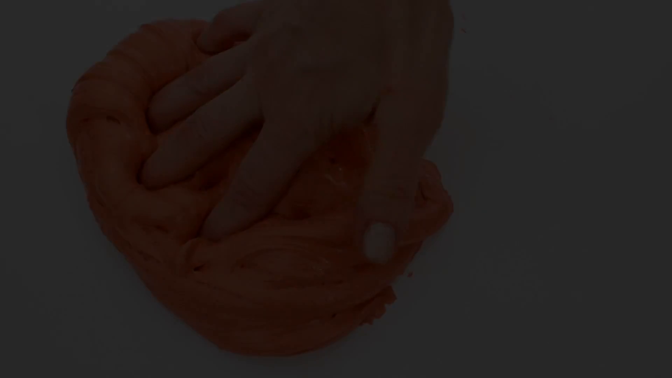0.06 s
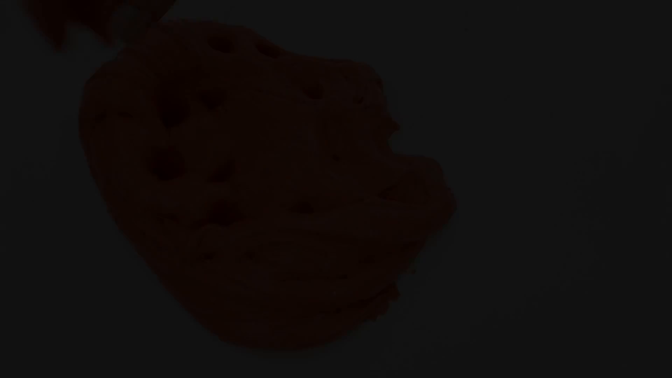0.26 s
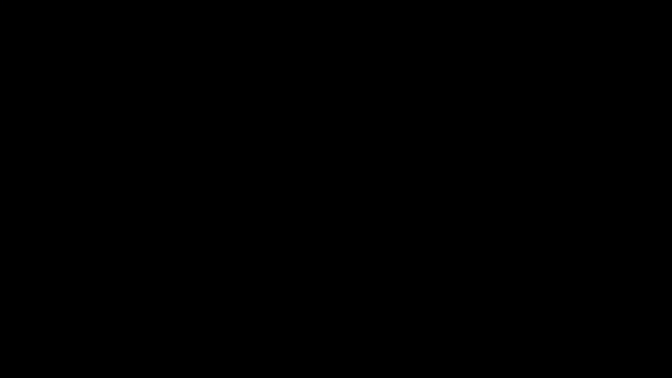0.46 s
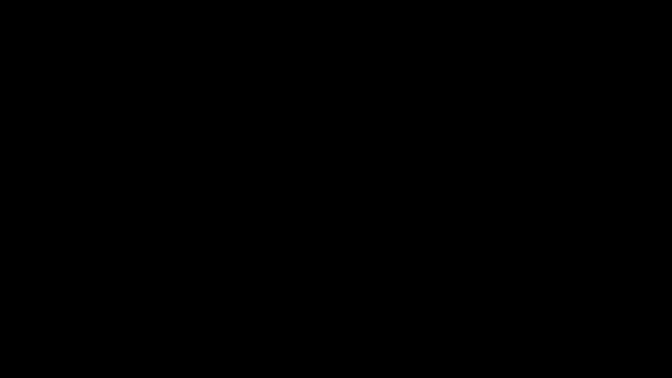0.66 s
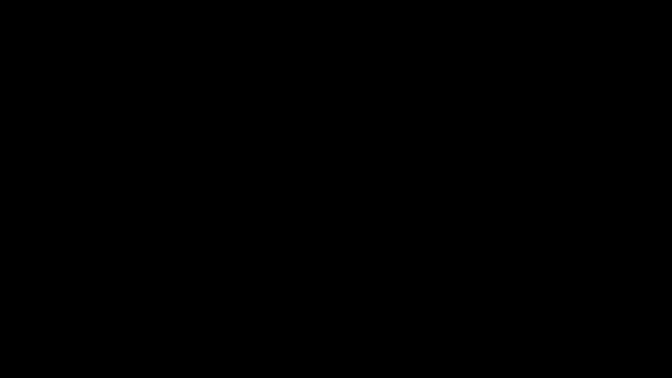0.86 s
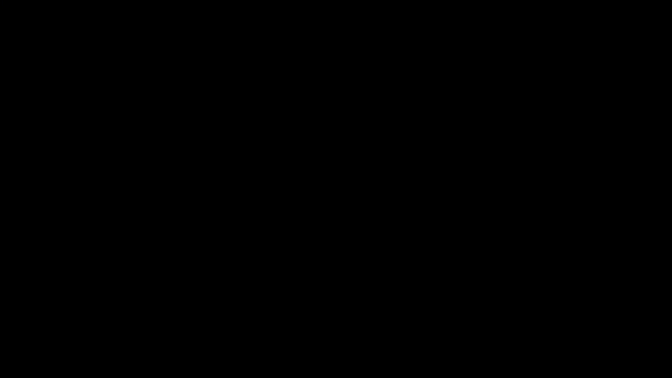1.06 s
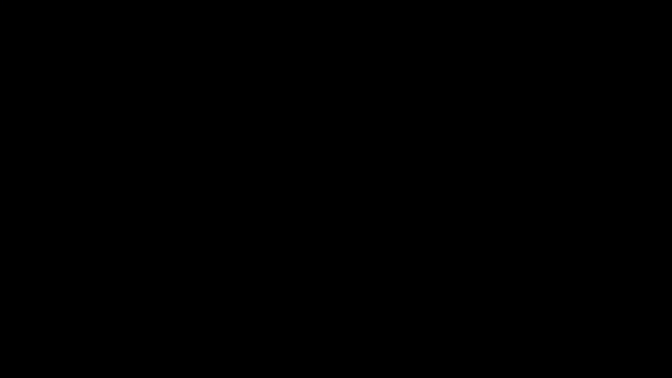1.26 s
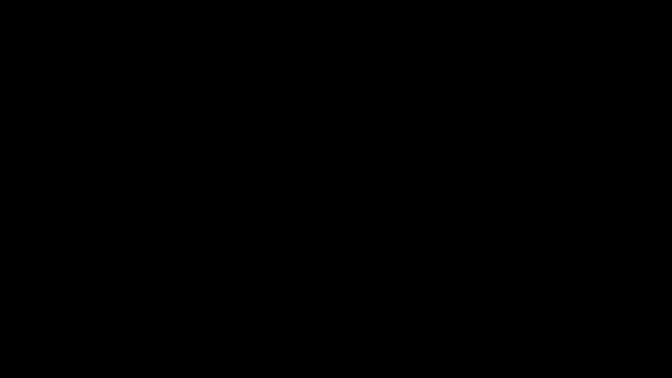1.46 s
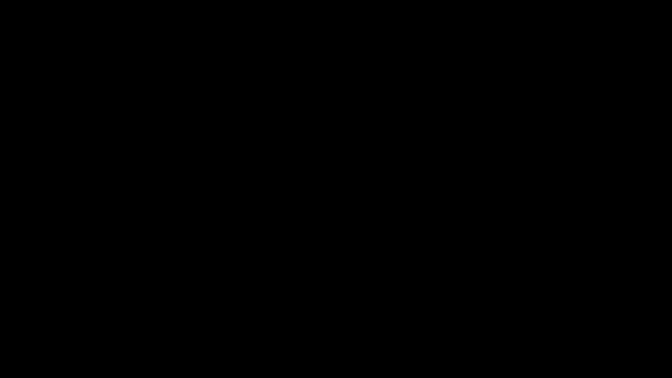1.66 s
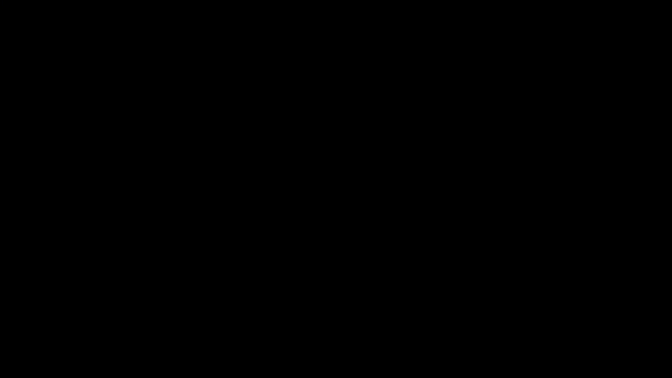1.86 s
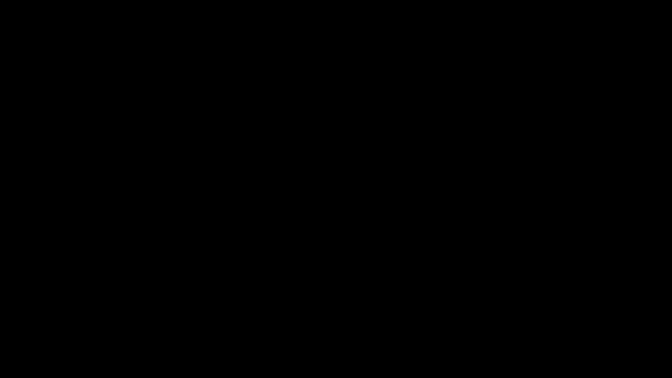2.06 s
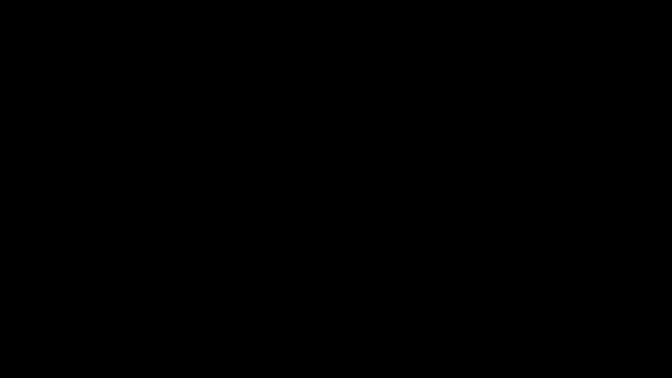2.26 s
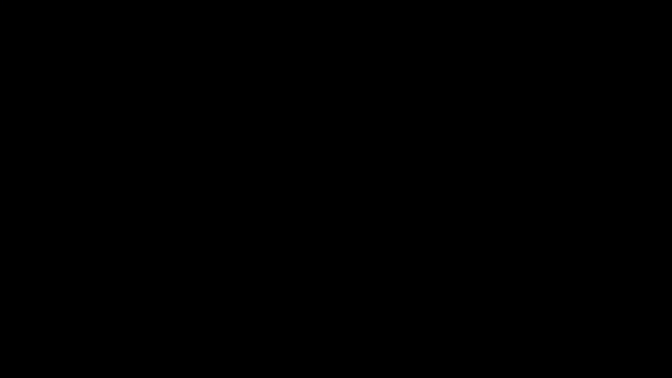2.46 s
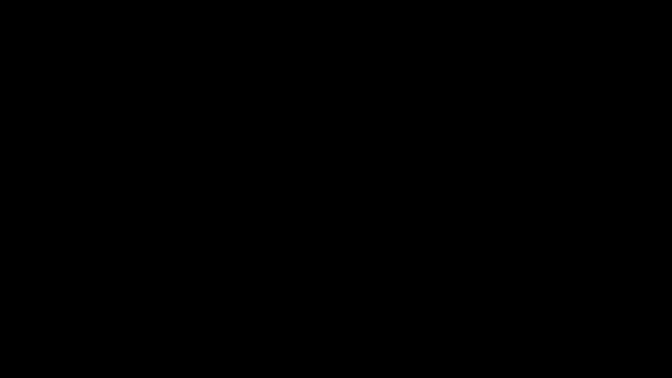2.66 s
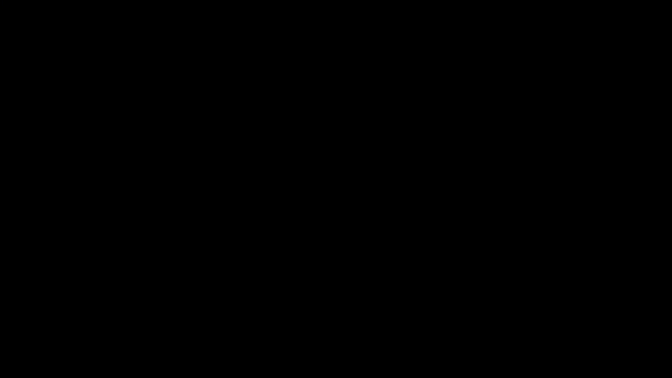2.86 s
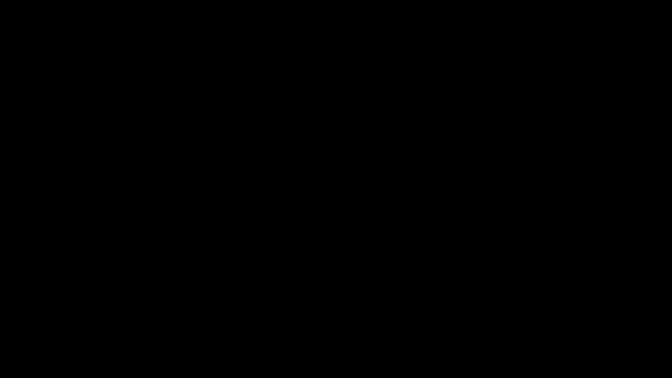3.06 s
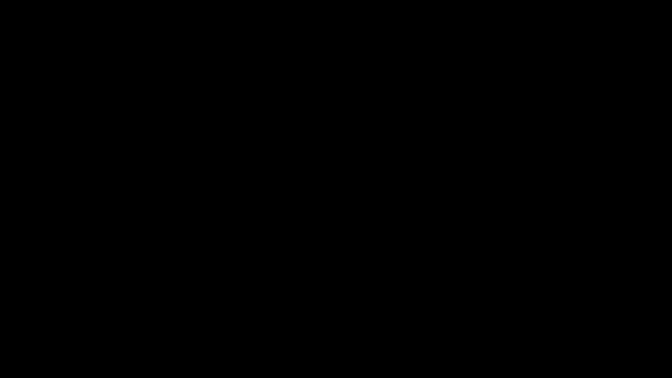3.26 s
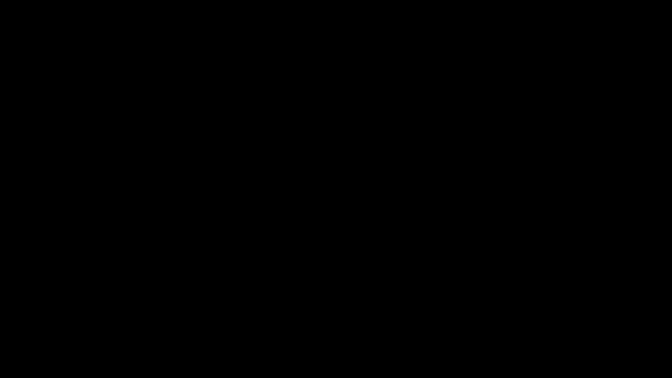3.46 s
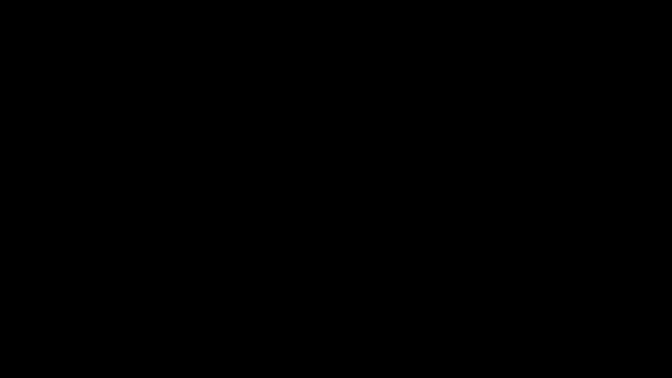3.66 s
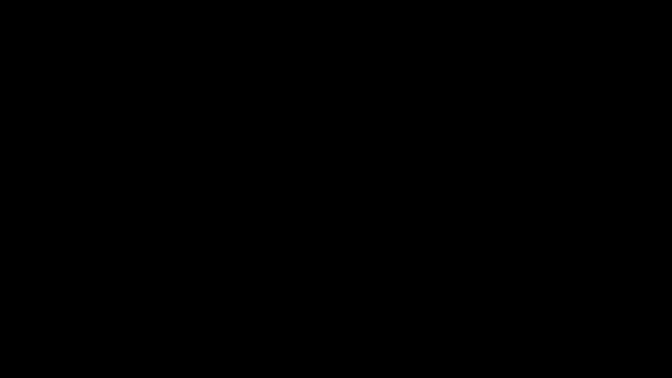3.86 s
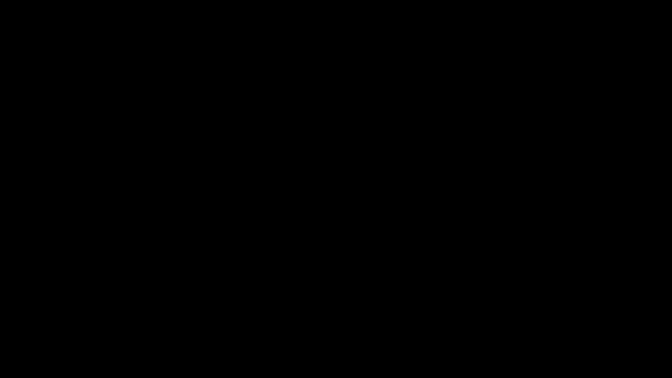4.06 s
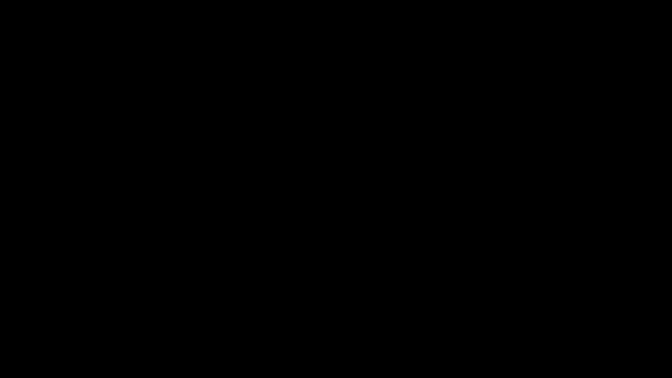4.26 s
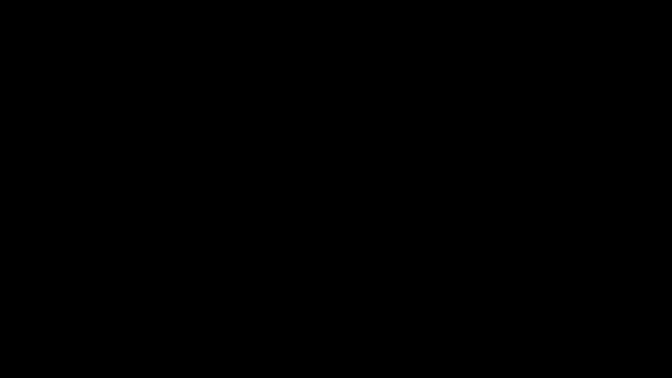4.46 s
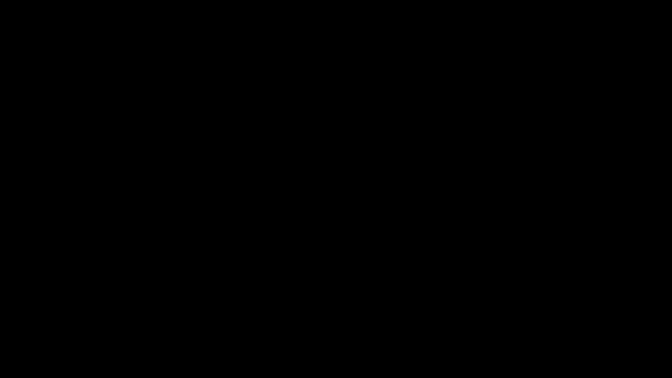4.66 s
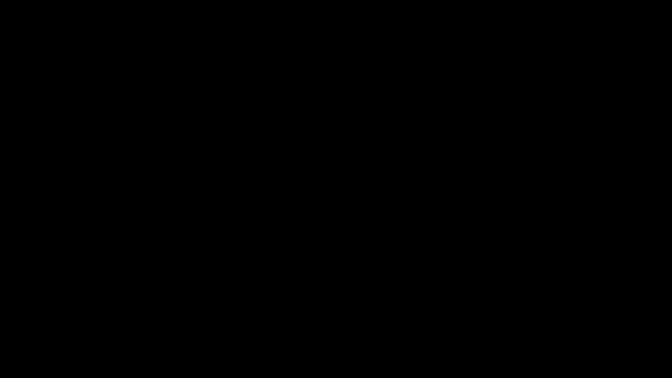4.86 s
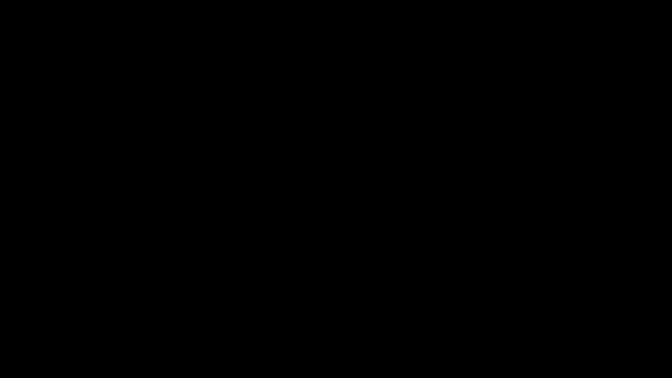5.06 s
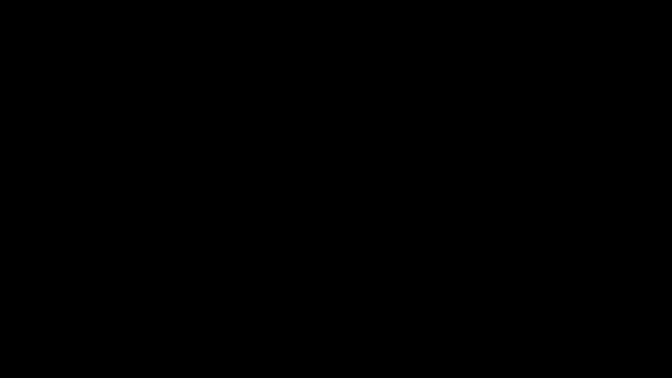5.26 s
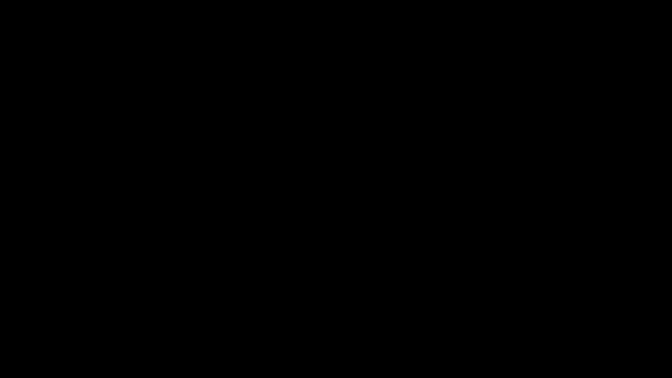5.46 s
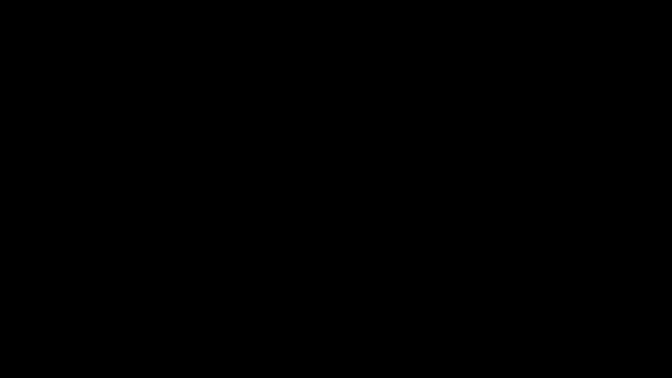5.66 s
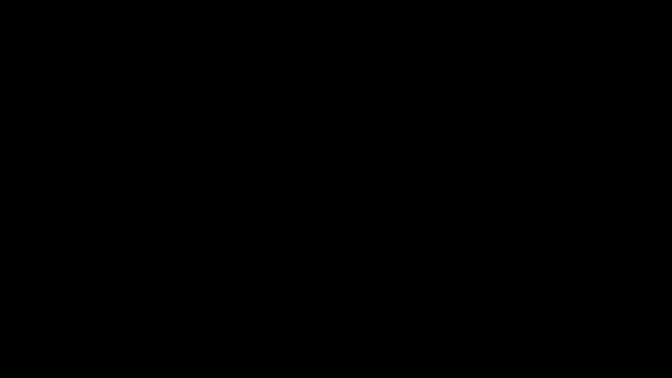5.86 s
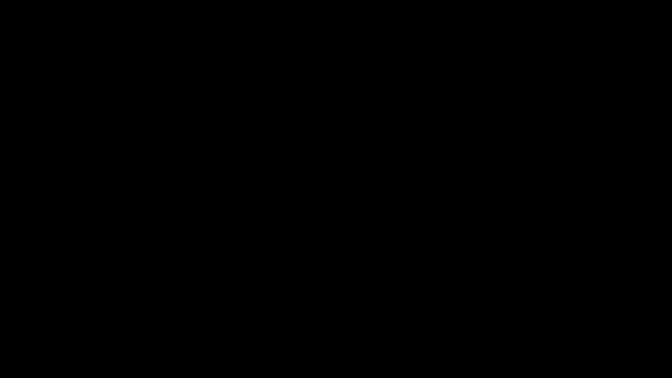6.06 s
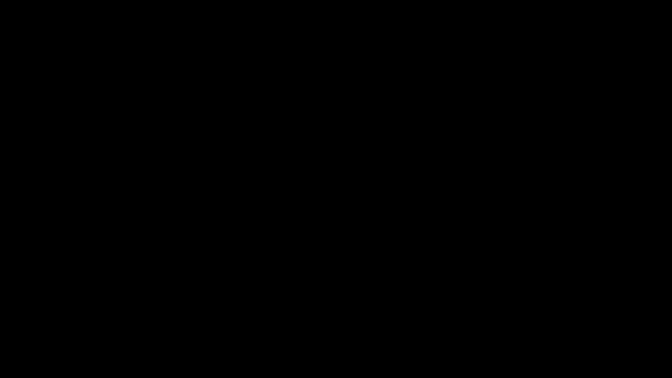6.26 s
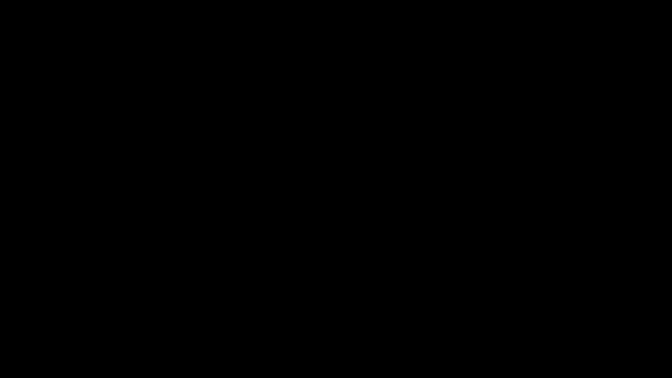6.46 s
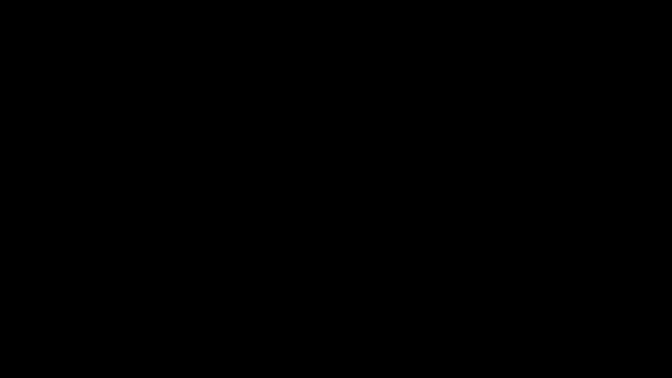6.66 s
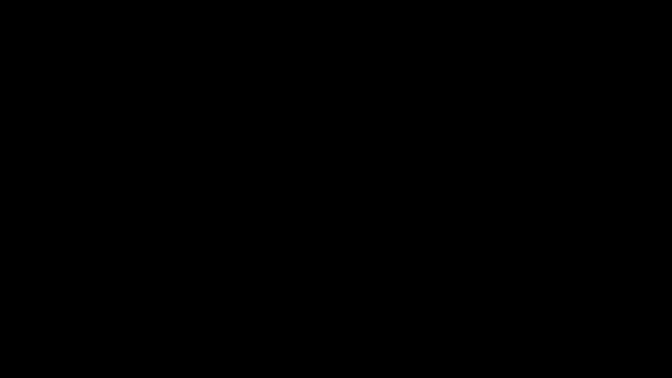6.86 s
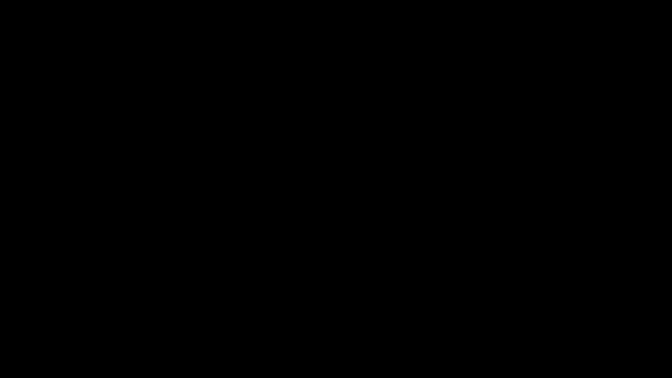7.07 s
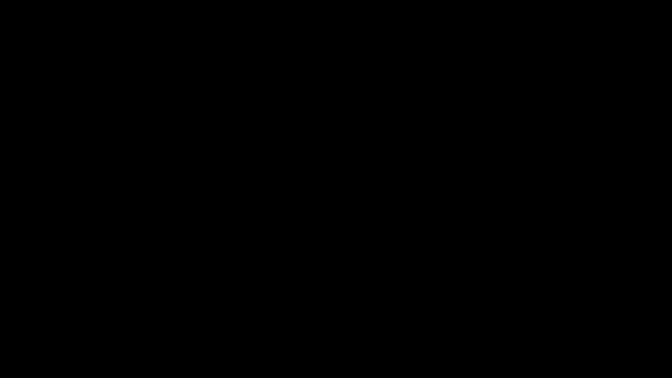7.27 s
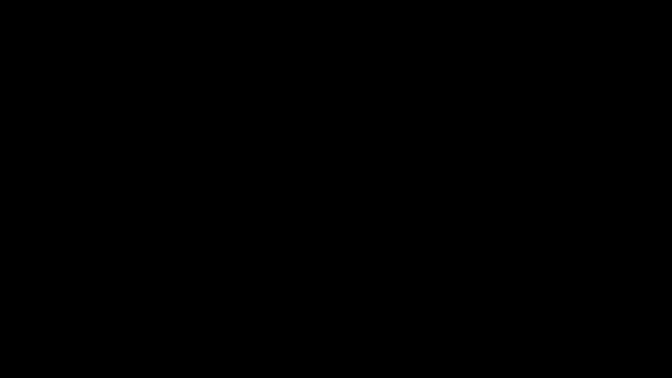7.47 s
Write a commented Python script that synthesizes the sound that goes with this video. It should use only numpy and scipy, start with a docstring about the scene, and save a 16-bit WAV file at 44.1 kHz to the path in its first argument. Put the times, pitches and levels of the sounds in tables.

```python
"""Thick slime is kneaded on a table in a small quiet room, between two spaced microphones.
From the start, trapped air pockets burst as clicks that ring in their cavities, sticky films tear in
a crackle of resonant grains, and thuds and booms ring the table's modes; the pops crowd up to 1.7 s.
Air first leaks from a gap at 1.9 s as gliding narrow-band noise, then at 3.8 and 5.6 s among sparser pops.
Under it all, noise-made hiss, a wavering sine hum and the settling slime slowly fade to the end."""
import sys
import numpy as np
from scipy import signal
from scipy.fft import rfft, irfft
from scipy.io import wavfile

SR = 44100
rng = np.random.default_rng(int(sys.argv[2]) if len(sys.argv) > 2 else 0)


def unload_audio(sound):
    """Save the sound as a 16-bit wav file, at the path given as the first command line argument."""
    columns = np.transpose(np.atleast_2d(sound))
    # keep every value between -1 and 1, then stretch to whole-number steps
    steps = np.round(np.clip(columns, -1, 1) * 32767)
    wavfile.write(sys.argv[1], SR, steps.astype(np.int16))


N = 331620

# Bursting air pockets, timed at the left microphone: start_s, left_peak_db, right_peak_db, pitch_hz
POPS = [(0.1614, -2.5, 6.5, 7600), (0.1812, -3.5, 1.5, 6350), (0.1925, -17.5, -11, 1570),
        (0.1963, -6, 4.5, 9250), (0.4014, -41, -38, 2090), (0.423, -46.5, -55, 2500),
        (0.4546, -41, -47, 2070), (0.505, -37, -37, 1900), (0.528, -42, -23, 13100),
        (0.5633, -16, -5, 15900), (0.6725, -14, -11, 9900), (0.694, -2.5, -0.5, 6400),
        (0.731, -17, -9.5, 10520), (0.7443, -7.5, -31, 7660), (0.758, -16, -10.5, 4400),
        (0.771, 0.5, 1.5, 6400), (0.8011, 3, 6, 11670), (0.8258, -37, -55, 8560), (0.8436, 5, 0.5, 12000),
        (0.852, -11, -10, 4230), (0.8655, -37, -12, 6450), (0.905, -16.5, -9.5, 7500),
        (1.3302, -32.5, -33, 2860), (1.3389, -34.5, -34, 1870), (1.4255, -44, -20.5, 13500),
        (1.4951, -12.5, -12.5, 3300), (1.508, -41, -22, 11000), (1.538, -32, -25, 10500),
        (1.557, -38, -19, 12940), (1.5643, -24.5, -23, 6850), (1.5882, -18, -15.5, 7100),
        (1.6068, -13, -9, 13500), (1.6167, 1.5, 8, 7000), (1.6276, 4.5, 7, 7030), (1.6553, 4, 2.5, 8120),
        (1.6685, -1, 3.5, 13130), (1.686, -16, 3.5, 12710), (1.692, -1, 1.5, 12400),
        (1.7095, -12.5, -5, 13800), (2.127, -30, -31, 1680), (2.1324, -22, -18.5, 5160),
        (2.2333, -37.5, -35.5, 7900), (2.3506, -35.5, -20.5, 5050), (2.389, -30, -41, 6900),
        (2.442, -3, -4, 13200), (2.446, 2, 1.5, 14800), (2.4814, -14, -37.5, 12900), (2.502, -9, -9, 11240),
        (2.5568, -59, -23.5, 12300), (2.636, -41.5, -21, 13000), (2.962, -53, -48.5, 5110),
        (3.134, -46.5, -42.5, 11000), (3.314, -23.5, -20.5, 2320), (3.3294, -11.5, -6, 7620),
        (3.629, -59.5, -41, 1940), (3.707, -22.5, -32, 12540), (3.7324, -31, -27.5, 4120),
        (3.769, -26, -33, 9200), (3.852, -40, -57.5, 11100), (3.882, -36.5, -35, 11500),
        (4.165, -74, -39.5, 11220), (4.229, -64, -33, 10170), (4.298, -46, -34, 3050),
        (4.4168, -60, -41.5, 10960), (4.595, -56, -36, 9850), (5.1325, -38, -37.5, 1597),
        (5.167, -43.5, -50, 2470), (5.218, -29.5, -24, 13000), (5.2945, -30.5, -31, 13400),
        (5.3883, -14, -21, 15000), (5.43, -28, -34, 8940), (5.488, -41.5, -29, 9550),
        (5.587, -36.5, -26, 14260), (5.745, -53, -47, 1796), (5.9727, -43.5, -35.5, 9850),
        (6.3556, -18, -13, 4670), (6.361, -29.5, -19.5, 7000), (6.7961, -50, -44, 10600),
        (6.8165, -51.5, -42, 11400), (6.9059, -41.5, -43, 10500), (7.0338, -51, -25.5, 12740),
        (7.066, -59, -48.5, 3010), (7.105, -57, -43.5, 7530), (7.2175, -56.5, -52.5, 13930),
        (7.311, -63, -51, 9400), (7.3434, -63.5, -38.5, 5740), (7.357, -60.5, -47, 10920)]
# Squeezes that tear the films, levels where the hold begins: hold_start_s, hold_s, crackle_db, squelch_db
SQUEEZES = [(0.122, 0.026, -54.5, -66), (0.18, 0.037, -39.5, -34.5), (0.41, 0.09, -67.5, -59.5),
            (0.563, 0.13, -56, -64), (0.689, 0.1, -44.5, -51), (0.763, 0.13, -40.5, -54),
            (0.958, .04, -54.5, -56.5), (1.012, 0.032, -54.5, -51.5), (1.029, 0.02, -51, -60.5),
            (1.078, 0.018, -47.5, -49.5), (1.34, 0.074, -65, -58), (1.463, 0.27, -56.5, -59.5),
            (1.618, 0.064, -33, -53), (1.837, .03, -54.5, -69), (1.863, 0.05, -46, -44),
            (2.138, 0.018, -58.5, -49), (2.225, 0.019, -61, -62.5), (2.444, 0.075, -43.5, -58.5),
            (2.632, 0.09, -51, -54), (2.73, 0.12, -60.5, -69), (3.334, 0.0043, -39, -42.5),
            (3.672, 0.2, -55.5, -60.5), (3.797, 0.028, -48.5, -60.5), (3.872, 0.033, -58.5, -66.5),
            (3.941, 0.0088, -57.5, -66), (4.004, 0.059, -65, -83), (4.091, 0.022, -68.5, -73),
            (4.178, 0.014, -70.5, -76), (4.294, 0.06, -66.5, -72), (4.825, 0.032, -63.5, -68),
            (4.87, 0.024, -50.5, -55), (5.126, 0.3, -66, -69.5), (5.393, .1, -52, -70),
            (5.597, 0.097, -60, -68), (5.651, 0.16, -60.5, -67), (6.356, 0.0082, -43.5, -55),
            (6.85, 0.14, -66, -75.5), (6.988, 0.11, -70, -72.5)]
# Relative spectrum of the tearing films: frequency_hz, density_db (per Hz)
CRACKLE_SPECTRUM = [(700, -21.5), (1500, -9.5), (3000, -13), (6000, -8), (9000, -4.5), (13000, -5.5),
                    (16500, -9)]
# Air escaping through a closing gap: start_s, length_s, first_pitch_hz, last_pitch_hz, level_db
LEAKS = [(1.948, 0.028, 6530, 6420, -49.5), (3.806, 0.176, 473.6, 514, -59.5),
         (5.602, .21, 430, 722, -62.5), (5.61, .09, 2500, 2120, -62)]
# Fingers and lumps knocking the table top: start_s, spectrum_centre_hz, level_db
THUDS = [(0.1608, 455, -17.5), (0.1815, 534, -13), (0.1926, 498, -18.5), (0.399, 295, -44),
         (0.4545, 250, -35.5), (0.5039, 332, -36), (0.6933, 563, -26.5), (0.772, 618, -28),
         (0.8486, 818, -24.5), (0.907, 650, -42.5), (0.955, 510, -35.5), (1.3343, 282, -30),
         (1.4965, 630, -30), (1.6193, 646, -31.5), (1.6563, 700, -40), (1.864, 557, -41.5),
         (2.1282, 317, -26), (2.1322, 316, -31), (2.636, 501.4, -42.5), (3.315, 550, -40.5),
         (3.3296, 583, -38.5), (3.628, 176.7, -38.5), (4.185, 495, -54.5), (4.299, 696, -55),
         (4.8897, 254.7, -34.5), (5.1297, 267, -39.5), (5.165, 279.6, -44.5), (6.3567, 396, -28)]
# The hand leaning on the table: start_s, spectrum_centre_hz, level_db
PUSHES = [(0.221, 56.5, -32), (1.038, 29.8, -45), (1.351, 62, -55.5), (1.903, 50.7, -44.5),
          (2.17, 51.1, -41.5), (2.67, 44.8, -51.5), (3.358, 39.7, -45.5), (3.659, 50.3, -45.5),
          (4.898, 41, -46.5), (5.16, 56.3, -54), (6.38, 46.14, -47)]
# Modes of the table top: frequency_hz, level_db, t60_s
TOP_MODES = [(116.74, -6.5, 0.23), (185, -3.5, 0.06), (229, -3.5, 0.07), (280, -10.5, 0.13),
             (401, -3.5, 0.039), (458.8, -7.5, 0.0057), (518, -4.5, 0.044), (736, 1.5, 0.02)]
# Modes of the table frame: frequency_hz, level_db, t60_s
FRAME_MODES = [(26, -3.5, 1), (46, -2, 0.16), (63, -2.5, 0.27)]
# Decay of the room's tail: frequency_hz, t60_s
ROOM_DECAY = [(200, 0.099), (1200, 0.24), (2800, 0.08), (7500, .19), (16000, .1)]
# Relative spectrum of the hiss: frequency_hz, density_db (per Hz)
HISS_SPECTRUM = [(20, -8), (33, -17), (48, -5.5), (75, -28.5), (130, -19), (260, -30.5), (600, -47.5),
                 (1300, -41), (2400, -42.5), (7000, -47), (16500, -48)]
# Hum, mean of both sides before its wavering and the fade: frequency_hz, level_db
HUM = [(97, -70)]
# Gain on hum, hiss and settling slime: time_s, gain_db
FADE = [(0, 6.5), (3, 4.5), (7.52, -5.5)]

# Squeezes: slopes in dB per second
RISE_DB_PER_S, SAG_DB_PER_S = 797, 60.5
CRACKLE_FALL_DB_PER_S, SQUELCH_FALL_DB_PER_S = 418, 399.5
REST_CRACKLE_DB, REST_SQUELCH_DB = -80, -80  # slime settling between squeezes, before the fade
GRAINS_PER_S = 2000  # mean rate of film snaps per stream, before clumping
# Right side over left, in dB, and its later arrival
SLIME_RIGHT_DB, TOP_RIGHT_DB, FRAME_RIGHT_DB, RIGHT_LAG_S = 9, 8, 2.2, 0.00236
ROOM_DB, HISS_DB = -36, -67.5  # gain of the tail; hiss before the fade
CEILING, CUTOFF_HZ = 0.68, 17100  # ceiling relative to full scale


def pops(cycles=4.9, click_db=-8.0, scatter_db=-27, scatter_cycles=200, reach=1.3):
    """Damped cavity resonance: a burst clicks and rings a few cycles, scattered by the folds around it."""
    length = 2000
    t = np.arange(length) / SR
    out = np.zeros((2, N + length))
    folds = rng.standard_normal((len(POPS), 2, length))
    for (start_s, left_db, right_db, hz), fold in zip(POPS, folds):
        # high pitches are soaked up sooner
        scatter_decay = amp(scatter_db - 60 * t * (hz + 2000) / scatter_cycles)
        # cubing leaves few strong paths among many weak ones
        paths = scatter_decay * fold ** 3 / 2
        paths[:, 0] = 1  # the direct path
        ringing = ring(paths, min(hz, 0.4 * SR), cycles / hz)
        click = amp(click_db) * soften(paths, min(reach * hz, 0.45 * SR))
        # a small pocket radiates nothing far below its pitch
        small_source = signal.butter(2, 0.32 * hz, "high", fs=SR, output="sos")
        burst = signal.sosfilt(small_source, ringing + click)
        burst /= np.abs(burst).max(axis=1, keepdims=True)
        at = round(start_s * SR)
        out[:, at:at + length] += burst * amp([[left_db], [right_db]])
    return out[:, :N]


def squeezing(peak_db, fall_db_per_s, rest_db):
    """Addition of powers: squeezes rise fast, sag while held and die away over a resting level; in dB."""
    t = np.arange(0, N + 64, 64) / SR
    start, hold = np.transpose(SQUEEZES)[:2, :, None]
    since = t - start
    rise = RISE_DB_PER_S * np.minimum(since, 0)
    sag = SAG_DB_PER_S * np.clip(since, 0, hold)
    fall = fall_db_per_s * np.maximum(since - hold, 0)
    db = peak_db[:, None] + rise - sag - fall
    power = np.interp(np.arange(N) / SR, t, np.sum(amp(2 * db), axis=0))
    rest_power = amp(2 * (rest_db + in_time(FADE)[0]))
    return 10 * np.log10(power + rest_power)


def grains(per_s, size_db):
    """Random point process: clicks of chance size clump in time, partly shared by both sides; rms 1."""
    sizes = amp(size_db * np.minimum(rng.exponential(1, (3, N)), 4))
    signs = rng.choice([-1, 1], (3, N))
    chance = per_s * amp(3.0 * drift(60)) / SR
    born = rng.random((3, N)) < chance
    clicks = sizes * signs * born
    return rms_one(clicks[:2] + 0.28 * clicks[2])


def cavities(clicks, low_hz, high_hz, cycles, patchy_db):
    """Resonator bank: clicks are dealt to cavities of eight sizes, each coming and going; rms 1."""
    dealt = rng.integers(0, 8, N)
    total = np.zeros((2, N))
    for size, hz in enumerate(np.geomspace(low_hz, high_hz, 8)):
        share = clicks * (dealt == size) * amp(patchy_db * drift(27))
        total += ring(share, hz, cycles / hz)
    return rms_one(total)


def films(crackle_db, squelch_db):
    """Resonance scales with size: small films snap brightly over wet hiss, bigger cavities gurgle."""
    snaps = cavities(grains(GRAINS_PER_S, size_db=4.5), 2800, 15000, cycles=3.0, patchy_db=3.0)
    uneven_snaps = snaps * amp(3.4 * drift(70))
    wet = amp(-5) * rng.standard_normal((2, N))
    crackle = rms_one(colour(uneven_snaps + wet, CRACKLE_SPECTRUM))
    gurgle = cavities(grains(900, size_db=3), 330, 2700, cycles=11.0, patchy_db=4.0)
    return crackle * amp(crackle_db) + soften(gurgle, 3700) * amp(squelch_db)


def torn_films():
    """Forced excitation: every squeeze drives crackle and squelch with envelopes of their own."""
    crackle_db, squelch_db = np.transpose(SQUEEZES)[2:]
    return films(squeezing(crackle_db, CRACKLE_FALL_DB_PER_S, REST_CRACKLE_DB),
                 squeezing(squelch_db, SQUELCH_FALL_DB_PER_S, REST_SQUELCH_DB))


def leaks(width_share=0.37):
    """Modulated noise: a narrow band lies around the gap's pitch, which glides as the gap shrinks."""
    out, t = np.zeros((2, N)), np.arange(N) / SR
    for start_s, length_s, first_hz, last_hz, db in LEAKS:
        done = np.clip((t - start_s) / length_s, 0, 1)
        pitch_hz = first_hz + (last_hz - first_hz) * done
        tone = np.sin(2 * np.pi * np.cumsum(pitch_hz) / SR)
        wobble = rms_one(soften(rng.standard_normal((2, N)), width_share * first_hz / 2))
        envelope = np.minimum(8 * done, 1) * np.sqrt(1 - done)
        out += amp(db) * envelope * wobble * tone
    return out


def struck(modes, blows, reach_db, spread_db):
    """Modal excitation: a blow drives modes near its spectrum's centre, losing reach_db an octave away."""
    start_s, centre_hz, blow_db = np.transpose(blows)
    out = np.zeros((2, N))
    for hz, level_db, t60 in modes:
        clicks = np.zeros((2, N))
        luck = rng.standard_normal((len(start_s), 2)).T
        octaves_away = np.abs(np.log2(hz / centre_hz))
        drive_db = blow_db + level_db - reach_db * octaves_away + spread_db * luck
        clicks[:, (start_s * SR).astype(int)] = amp(drive_db)
        out += ring(clicks, hz, t60) * rng.choice([-1, 1])
    return out


def table():
    """Modal superposition: knocks ring the table top, and the leaning hand booms the low frame."""
    top = soften(struck(TOP_MODES, THUDS, reach_db=19.0, spread_db=2.3), 3800)
    frame = struck(FRAME_MODES, PUSHES, reach_db=5.2, spread_db=1.3)
    frame = soften(soften(frame, 87), 87)
    return to_right(TOP_RIGHT_DB) * top + to_right(FRAME_RIGHT_DB) * frame


def spaced(x):
    """Propagation delay: sound reaches the right microphone later."""
    lag = round(RIGHT_LAG_S * SR)
    return np.array([x[0], np.concatenate([np.zeros(lag), x[1, :N - lag]])])


def room(x):
    """Diffuse reverberation: each side has its own dense noise tail, dying band by band."""
    t = np.arange(12000) / SR
    tail = np.zeros((2, len(t)))
    edges = np.geomspace(120, 17000, 9)
    for low, high in zip(edges, edges[1:]):
        band_pass = signal.butter(2, [low, high], "band", fs=SR, output="sos")
        band = signal.sosfilt(band_pass, rng.standard_normal((2, len(t))))
        tail += band * amp(-60 * t / at_hz(ROOM_DECAY, np.sqrt(low * high)))
    tail *= np.clip(t / 0.0021, 0, 1)  # builds up over 2.1 ms
    crossed = x + 0.3 * x[::-1]
    return signal.oaconvolve(crossed, tail, axes=-1)[:, :N]


def background():
    """Incoherent noise and a modulated tone: unrelated hiss on each side, and a hum wavering throughout."""
    out = amp(HISS_DB) * rms_one(colour(rng.standard_normal((2, N)), HISS_SPECTRUM))
    for hz, level_db in HUM:
        turns = np.cumsum(hz * (1 + 0.012 * drift(7))) / SR
        tone = np.sin(2 * np.pi * turns + [[0], [1.5]])  # right side 1.5 rad ahead
        out = out + amp(level_db + 2.4 * drift(24)) * tone * to_right(4)
    return out * amp(in_time(FADE)[0])


def ring(clicks, hz, t60):
    """Damped oscillator: a unit click sets a decaying sine of height 1 ringing in a two-pole filter."""
    r, w = amp(-60 / (t60 * SR)), 2 * np.pi * hz / SR
    return signal.lfilter([0, np.sin(w)], [1, -2 * r * np.cos(w), r * r], clicks + 1e-18)


def colour(x, spectrum):
    """Minimum-phase filtering: folding the cepstrum forward makes a causal filter of the spectrum."""
    hz = np.fft.rfftfreq(8192, 1 / SR)
    cepstrum = irfft(np.log(amp(at_hz(spectrum, hz))))
    cepstrum[1:4096] *= 2
    cepstrum[4097:] = 0
    impulse = irfft(np.exp(rfft(cepstrum)))
    return signal.oaconvolve(x, impulse[None], axes=-1)[:, :N]


def soften(x, hz):
    """Low-pass filtering: frequencies above hz roll off at 12 dB an octave."""
    return signal.sosfilt(signal.butter(2, hz, fs=SR, output="sos"), x)


def drift(rate):
    """Slow random modulation: chance values, rate a second, are joined by lines."""
    knots = rng.standard_normal(1000)
    return np.interp(np.arange(N) / SR * rate, np.arange(len(knots)), knots)


def to_right(db):
    """Level difference: the right side gains half of it and the left loses half."""
    return amp([[-db / 2], [db / 2]])


def amp(db):
    """Decibel law: 20 dB is a factor of ten in amplitude."""
    return 10 ** (np.asarray(db) / 20)


def rms_one(x):
    """Normalisation: the root mean square becomes 1."""
    return x / np.sqrt(np.mean(x ** 2) + 1e-20)


def in_time(rows):
    """Linear interpolation: each column is drawn out over every sample."""
    s, *columns = np.transpose(rows)
    return [np.interp(np.arange(N) / SR, s, c) for c in columns]


def at_hz(points, hz):
    """Logarithmic frequency scale: values are interpolated along it."""
    points = np.array(points)
    return np.interp(np.log(np.maximum(hz, 1)), np.log(points[:, 0]), points[:, 1])


def scene():
    """Superposition: slime and table reach both microphones, then room and background are added."""
    kneading = pops() + to_right(SLIME_RIGHT_DB) * (torn_films() + leaks())
    direct = spaced(kneading + table())
    return direct + amp(ROOM_DB) * room(direct) + background()


def record(dry):
    """Clipping and band limiting: the loudest peaks hit the ceiling; the treble is cut before and after."""
    cut = signal.cheby2(12, 70, CUTOFF_HZ, fs=SR, output="sos")
    clipped = np.clip(signal.sosfilt(cut, dry), -CEILING, CEILING)
    return signal.sosfilt(cut, clipped)


dry = scene()
out = record(dry)
unload_audio(out)
```